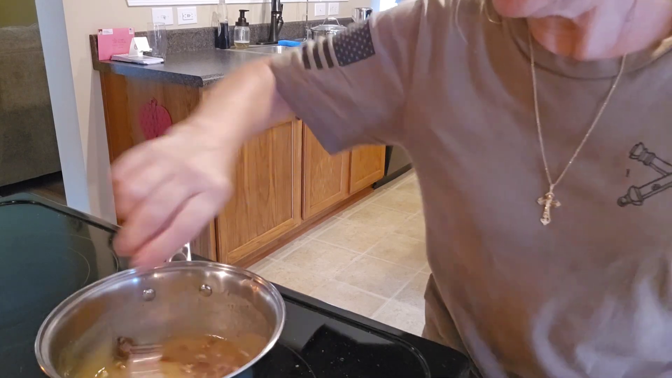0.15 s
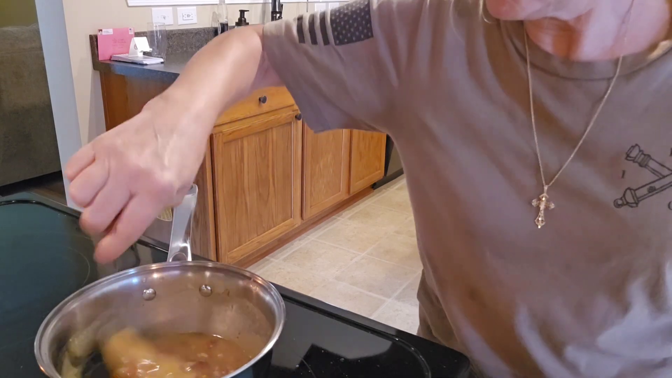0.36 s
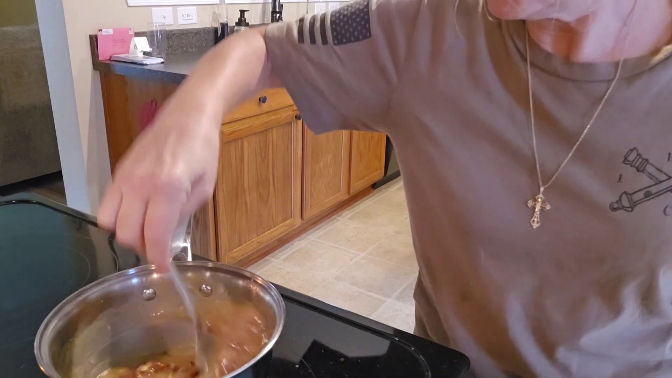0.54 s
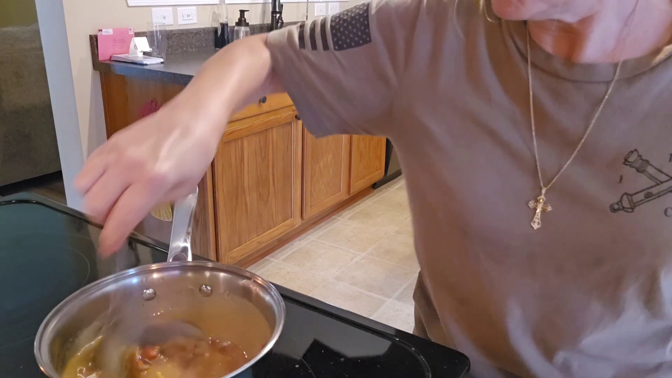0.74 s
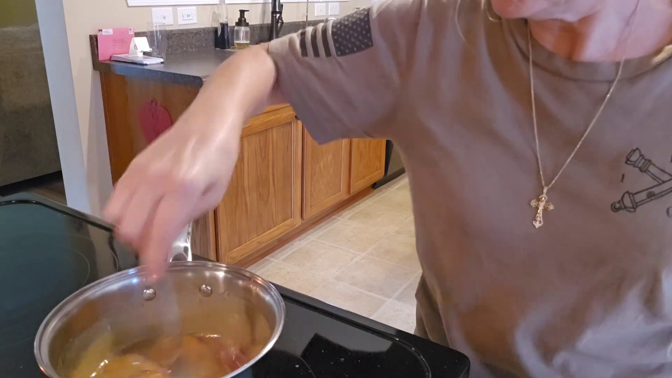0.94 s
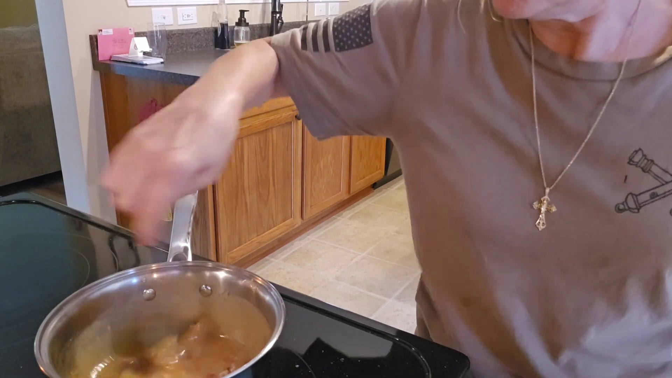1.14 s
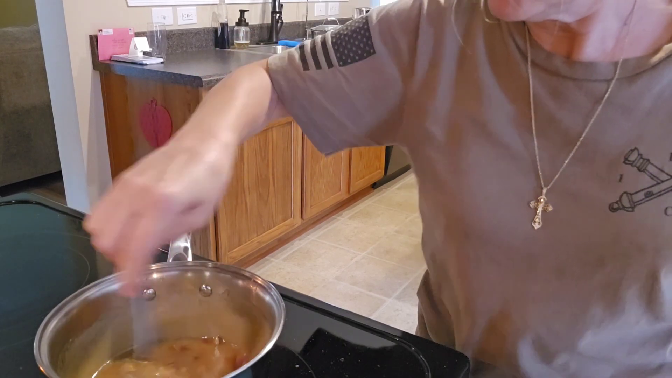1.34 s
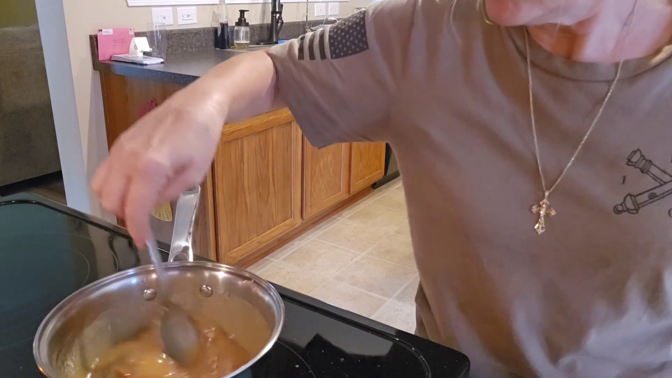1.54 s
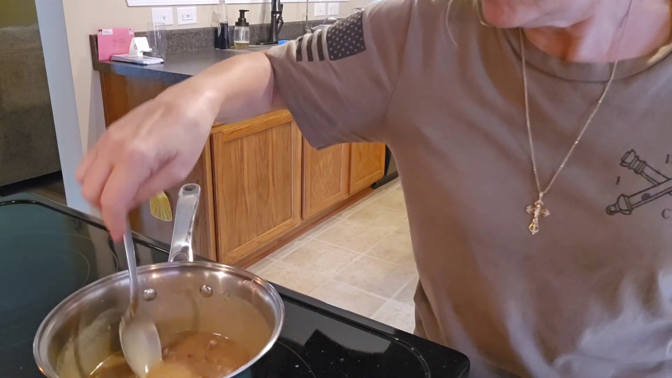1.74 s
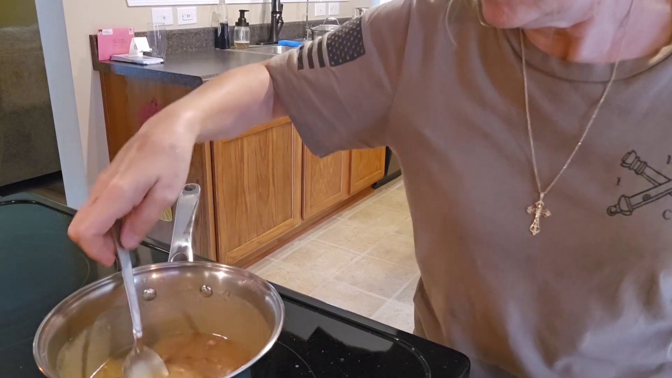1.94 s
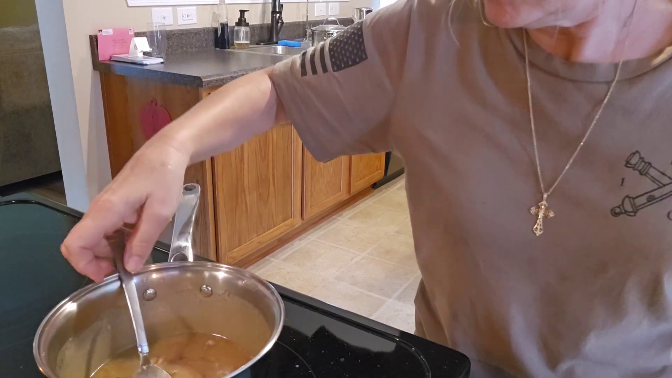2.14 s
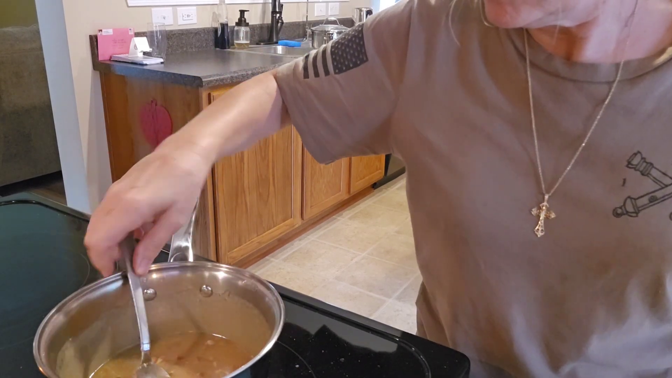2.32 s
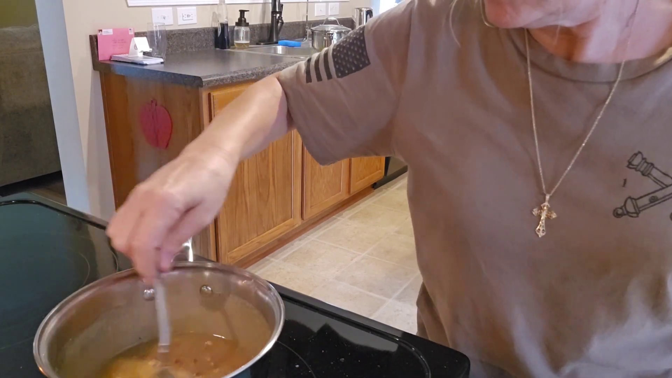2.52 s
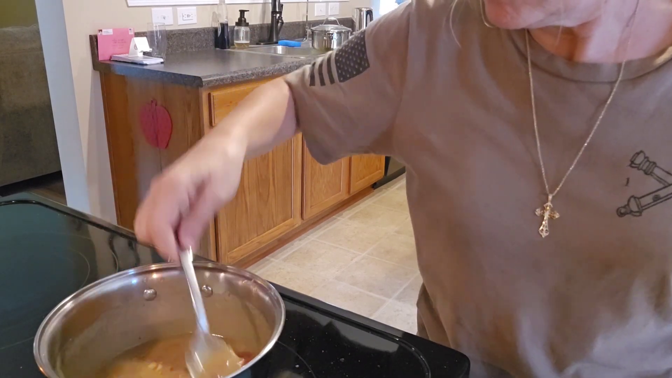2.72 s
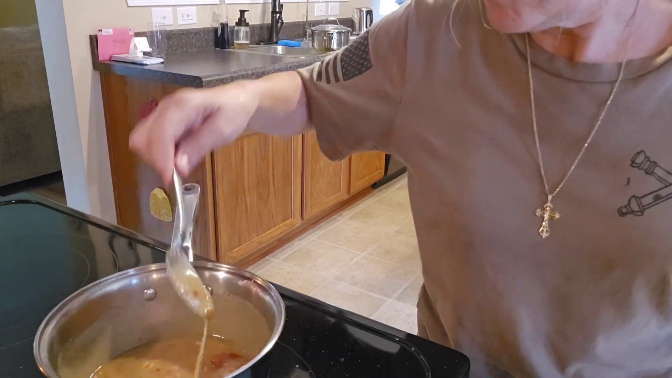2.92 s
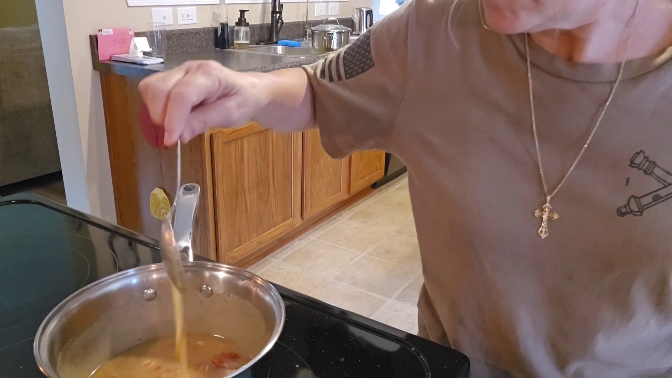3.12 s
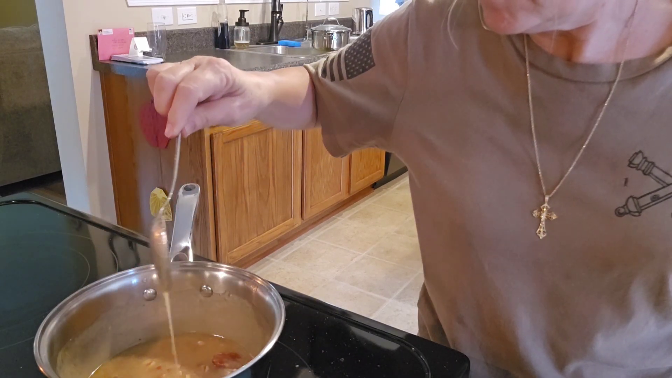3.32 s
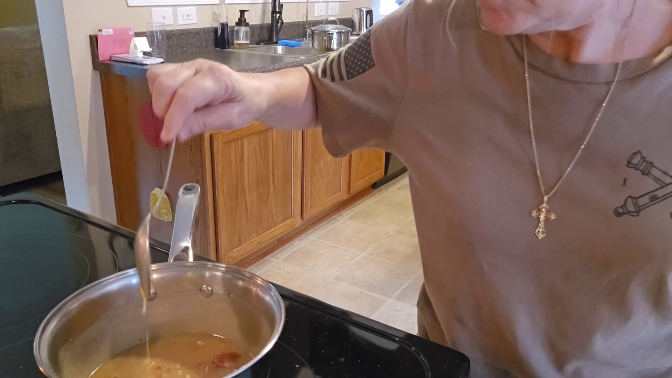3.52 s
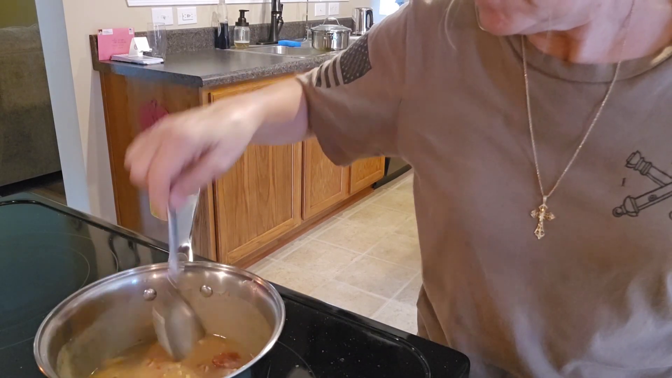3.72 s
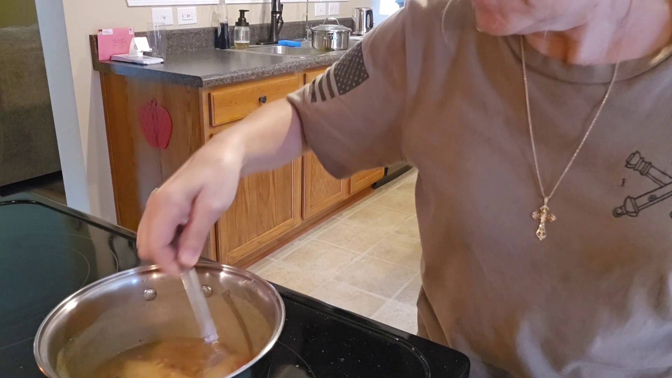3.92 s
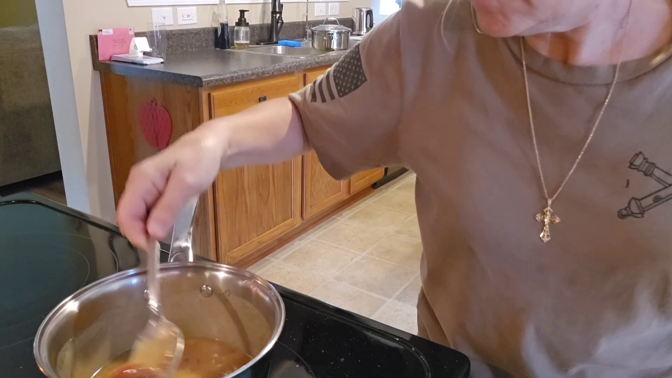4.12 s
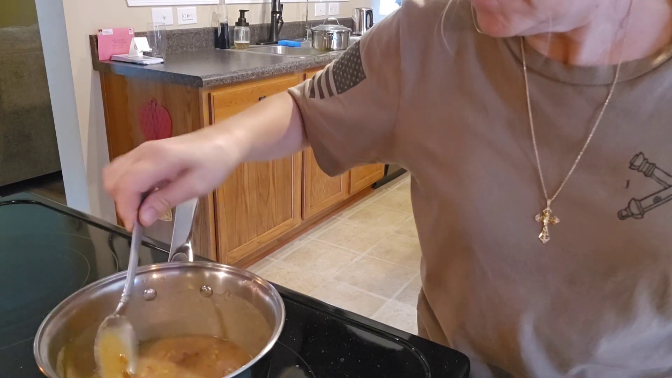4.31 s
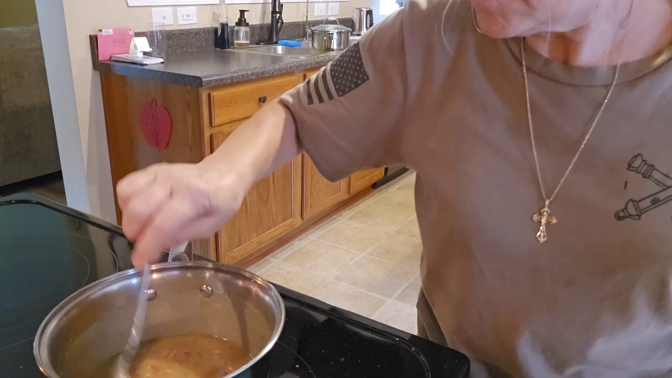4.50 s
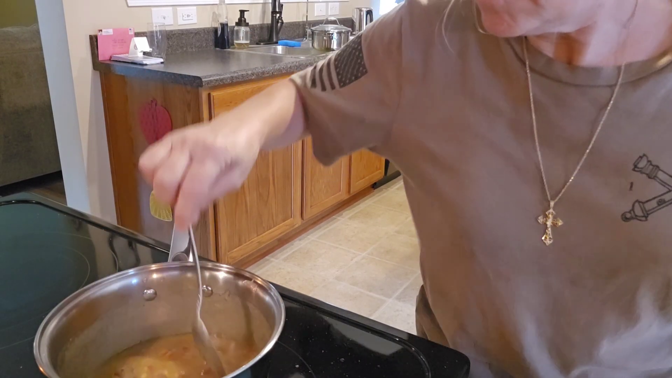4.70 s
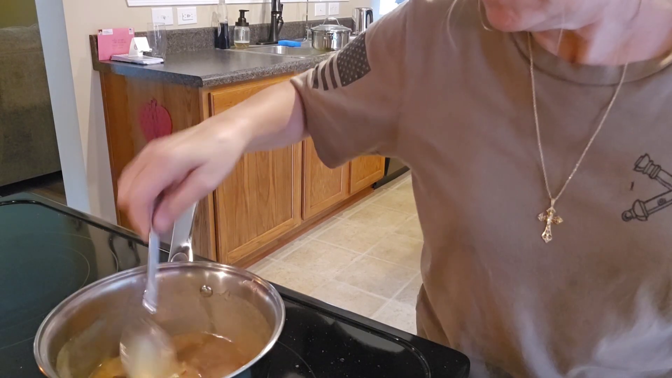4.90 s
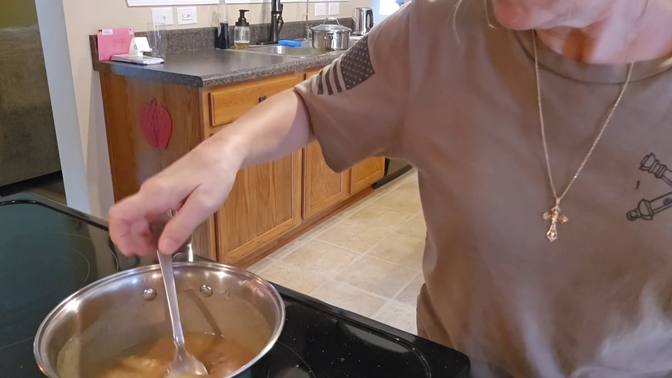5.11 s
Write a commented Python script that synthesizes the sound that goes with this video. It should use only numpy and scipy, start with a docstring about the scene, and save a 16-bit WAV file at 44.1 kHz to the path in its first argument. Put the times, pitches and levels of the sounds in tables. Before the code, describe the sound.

Close in a home kitchen, rapid rough scrapes of a spoon on a steel pan base come first, mixed with clinks and soft bubbly plops. Scraping thins out to separate knocks, stops while the spoon drips, then resumes with hard ringing clanks and dull thuds from the hob. The room gives a short lively echo; a steady low hum and soft rush stay behind everything.

```python
"""A spoon scrapes the steel base of a saucepan, with short squeals, and soon knocks on the wall.
Random slips shake the pan's resonances; knocks also ring the spoon and thud the pan on a glass hob.
Thick sauce plops as air pockets close (short sines), and small ticks come as the spoon hangs above to drip.
At the end the spoon is set down in the pan. Filtered noise and steady tones make an appliance's rush and hum.
Changing echoes place it all close by in a home kitchen."""
import sys
import numpy as np
from scipy import signal
from scipy.fft import rfft, irfft, next_fast_len
from scipy.io import wavfile
from scipy.ndimage import uniform_filter1d, map_coordinates

SR = 44100
rng = np.random.default_rng(int(sys.argv[2]) if len(sys.argv) > 2 else 0)


def master(y):
    """Save y as 16-bit WAV."""
    cut = np.clip(np.atleast_2d(y).T, -1, 1)
    pcm = np.round(cut * 32767)  # scale
    wavfile.write(sys.argv[1], SR, pcm.astype(np.int16))


N = 231697
T = np.arange(N) / SR  # time in seconds

# appliance rush, shape before levelling: f/Hz, density/dB per Hz
RUSH_SPECTRUM = [(15, -48.5), (25, -32), (59, -13), (123, -15), (195, -8.5), (242, -8), (301, -22.5),
                 (335, -14.5), (659, -37.5), (863, -33.5), (2690, -60.5), (5280, -59), (9070, -90),
                 (11000, -59.5), (16000, -77.5)]
# how alike diffuse sound is at the two ears: f/Hz, likeness (1 = the same)
EAR_LIKENESS = [(30, 0.45), (80, 0.67), (200, 1), (500, 0.15), (1500, 0.11)]
# steady appliance tones: f/Hz, level/dB
HUM_TONES = [(73, -59), (120, -56.5), (240, -59.5), (5450, -88.5), (10650, -92.5)]
# room tail: f/Hz, time to fall 60 dB/s (a negative time makes the tail grow until the final fade)
ROOM_DECAY = [(100, -0.1), (500, 0.78), (2000, 0.5852), (4000, 0.56), (8000, 0.47), (16000, 0.51)]
# strength of the room tail: f/Hz, level/dB
ROOM_LEVEL = [(100, -1.5), (500, -1.5), (2000, -5), (4000, -3), (8000, -8), (16000, -11)]
# balance of the direct sound: f/Hz, left minus right/dB
LEFT_RIGHT = [(100, -1), (700, -1), (2000, -2.5), (5000, -6.5), (9000, -9.5), (14000, -9)]
# tiny ticks: t/s, relative level/dB, centre f/Hz
TICK_EVENTS = [(1.745, -47, 13670), (3.113, -58, 3400), (3.222, -57.5, 4570), (3.306, -40, 5100),
               (3.489, -48, 5420), (4.096, -46, 13340)]
# air pockets closing in the sauce: t/s, relative level/dB, middle f/Hz
AIR_POCKETS = [(0.36, -34, 854), (.646, -29.5, 672), (.88, -25, 800), (.965, -36.5, 610),
               (1.002, -36.5, 780), (1.093, -42, 874), (1.88, -52.5, 1210), (3.244, -43, 890),
               (4.582, -40.5, 650)]
# steel modes damped by the sauce: f/Hz, width/Hz, relative level/dB
PAN_MODES = [(483, 260, -2.5), (886, 130, 2), (1281, 92, -0.5), (1589, 214, 3.5), (2025, 273, 1.5),
             (3013, 310, 9.5), (3396, 1030, 0.5), (3840, 210, 8), (4123, 170, 7.5), (4974, 515, 8),
             (5460, 380, 4.5), (5990, 570, 3.5), (7280, 870, 0), (8610, 320, 5), (9400, 380, -7),
             (9800, 67, -8.5), (10050, 1800, -14), (12010, 360, 1), (15300, 310, -19.5)]
# the whole pan bouncing on the hob: f/Hz, relative level/dB, time to fall 60 dB/s
HOB_MODES = [(128, -13.5, 0.33), (165.4, -15.5, 0.62), (185.3, -7, 0.14), (235, 0, 0.022),
             (347.4, -5, 0.045), (433, -13, 0.028)]
# spoon on pan: t/s, relative strength/dB, brightness/dB per octave, wall clang/dB,
# thud level/dB, spoon's note f/Hz, note level/dB
KNOCK_EVENTS = [(0.084, -10, 10, -6, -38.5, 1603, -30.5), (0.122, -11.5, -1.5, -1.5, -38.5, 1910, -40),
                (0.4698, -3, -2, 0.5, -28, 2893, -24.5), (1.039, -16, -1, -3, -39, 3160, -50),
                (1.9399, 4.5, -.5, -6.5, -25, 2000, -28), (1.9553, -6.5, -2, -4, -35.5, 1927, -32),
                (2.187, -3, 1, -2, -32.5, 2327, -30), (2.7435, -8.5, -1, -0.5, -47, 3050, -46),
                (2.751, -7.5, 0, -2.5, -45, 1673, -40), (3.8806, -5.5, 2, -8, -43, 1396, -40),
                (3.9021, 5.5, 3.5, -7.5, -22.5, 4430, -38), (4.6552, 9.5, 0.3, 7, -20.5, 3170, -20),
                (5.1162, 0.5, 0, -9, -31.5, 2100, -32), (5.1669, 11, 4, -8.5, -21.5, 2247, -17),
                (5.185, 5, 1.5, -9, -45, 3890, -25.5)]
# spoon sticking and slipping in step: middle t/s, half length/s, f/Hz, level/dB
SQUEAL_EVENTS = [(.025, 0.024, 1600, -42), (.055, 0.014, 216, -33.5), (.612, 0.018, 12000, -39),
                 (.60, 0.029, 2025, -46.5), (.79, 0.031, 8800, -41), (.838, 0.0051, 3886, -24),
                 (1.145, 0.031, 3720, -40), (1.30, 0.027, 12060, -41.5), (1.32, 0.011, 180, -37),
                 (2.685, 0.02, 4110, -38)]
# pushes over the steel: start t/s, length/s, relative level/dB, swell from start to end/dB,
# sharp grit relative/dB, dull rub relative/dB
PUSHES = [(-.01, 0.1, -31.5, -1, 0, -11.5), (0.453, 0.23, -32, -6, 5.5, -10.5),
          (.737, 0.1, -30.5, 6, -1, -15.5), (0.835, 0.16, -36, 6, -6, -7.5),
          (1.047, 0.12, -34, 6, 1.5, -16), (1.18, 0.17, -33.5, 5.5, -0.5, -11.5),
          (1.388, 0.1, -34.5, 0, -3, -10.5), (1.517, 0.1, -40, -2.5, -1.5, -8.5),
          (2.547, 0.19, -48, 26.5, -6.5, -6.5), (3.891, 0.1, -41.5, -5.5, -0.5, -4.5),
          (4.356, 0.024, -65.5, -0.5, -8.5, 6)]

RUSH_DB = -52
STIRS_PER_S, LEFT_LAG_S = 1.5, 0.0001  # the lag is an average
OVERTONE = 2.4  # the spoon's second note, as a multiple of its first
BITE_S, LET_GO_S = 0.0071, 0.004  # how fast a push starts and ends
ARCH_DB = 3.5  # extra pressure midway through a push
GRIT_PER_DB, RUB_PER_DB = 0.6, -0.43  # dB gained per dB of pressure: pressing sharpens the sound
TREMOR_DB, TREMORS_PER_S = 1.24, 26  # the hand's unsteady pressure
CEILING, CUTOFF_HZ = 0.9, 15800  # soft peak limit, before the top is cut


def from_db(db):
    """Turn decibels into a gain."""
    return 10 ** (np.asarray(db) / 20)


def at_hz(points, hz):
    """Read a table between its rows, on a log-frequency axis."""
    f, value = np.transpose(points)
    return np.interp(np.log(np.maximum(hz, 1)), np.log(f), value)


def butter(x, hz, kind, order=2):
    """Filter that reacts only to sound already past, with a smooth passband."""
    limit = np.minimum(hz, SR / 2 - 100)
    sections = signal.butter(order, limit, kind, fs=SR, output="sos")
    return signal.sosfilt(sections, x + 1e-18)


def drift(rate):
    """Smooth random wander, spread about 1, that turns about rate times a second."""
    coarse = T[::32]
    wander = map_coordinates(rng.standard_normal(4096), [coarse * rate], order=2, mode="wrap")
    return np.interp(T, coarse, wander)


def steady(x, size=2048):
    """Hold the average power at 1 over a short moving window: the grain stays, the swell goes."""
    return x / np.sqrt(np.abs(uniform_filter1d(x * x, size)) + 1e-20)


def resonate(x, hz, width_hz):
    """Shake one resonance, whose gain is 1 at its top."""
    r = np.exp(-np.pi * width_hz / SR)
    feed = np.array([1, 0, -1]) * (1 - r * r) / 2
    feedback = [1, -2 * r * np.cos(2 * np.pi * hz / SR), r * r]
    return signal.lfilter(feed, feedback, x + 1e-18)


def ring(t, hz, t60):
    """A sine that falls 60 dB in t60 seconds."""
    return np.sin(2 * np.pi * hz * t) * from_db(-60 * t / t60)


def add(track, s, sound):
    """Mix a sound into a track at s seconds."""
    start = max(round(s * SR), 0)
    track[start:start + len(sound)] += sound[:N - start]


def stereo(pair, hz):
    """Mix shared and opposite noise, so the ears match as closely as the table says at each pitch."""
    alike = np.clip(at_hz(EAR_LIKENESS, hz), -1, 1)
    shared = np.sqrt(1 + alike) * pair[0]
    opposite = np.sqrt(1 - alike) * pair[1] * np.array([[1], [-1]])
    return (shared + opposite) / np.sqrt(2)


def background():
    """An appliance's even, low rush of shaped noise, its hum and a faint whine."""
    size = next_fast_len(N)
    hz = np.fft.rfftfreq(size, 1 / SR)
    noise = stereo(rfft(rng.standard_normal((2, size))), hz)
    rush = irfft(noise * from_db(at_hz(RUSH_SPECTRUM, hz)), size)[:, :N]
    # the higher the tone, the more its phase wanders
    tones = sum(from_db(db) * np.sin(2 * np.pi * f * (T + 0.00002 * drift(60))) for f, db in HUM_TONES)
    return from_db(RUSH_DB) * steady(rush, size=3000) + tones


def echoes(near_db=-7, near_t60=0.07, gap_s=0.0013):
    """Response of one spot: quick echoes off hob and cook, plus a room tail shaped band by band."""
    t = T[:SR * 3 // 4]
    edges = np.geomspace(70, 18000, 13)
    white = rng.standard_normal((2, 2, len(t)))
    near = from_db(-60 * t / near_t60) * (t > 0.001)
    near_power = from_db(2 * near_db) * near ** 2 / np.sum(near ** 2)
    response = np.zeros((2, len(t)))
    for k, (low, high) in enumerate(zip(edges, edges[1:])):
        hz = np.sqrt(low * high)
        tail = from_db(-60 * t / at_hz(ROOM_DECAY, hz)) * (1 - np.exp(-(t / gap_s) ** 2))
        tail_power = from_db(2 * at_hz(ROOM_LEVEL, hz)) * tail ** 2 / np.sum(tail ** 2)
        band = butter(stereo(white[k % 2], hz), [low, high], "band")
        response += np.sqrt(tail_power + near_power) * band
    return response * np.clip(3 - 4 * t / t[-1], 0, 1)  # final fade to silence


def kitchen(x, count=4):
    """Direct sound from the right; the echoes change as the spoon circles from spot to spot."""
    place = count * STIRS_PER_S * T
    size = next_fast_len(N + SR)
    echo = 0
    for spot in range(count):
        distance = np.abs((place - spot + count / 2) % count - count / 2)
        nearness = np.cos(np.minimum(distance, 1) * np.pi / 2)
        echo = echo + irfft(rfft(x * nearness, size) * rfft(echoes(), size), size)[:, :N]
    # the left ear's delay sways once per stir
    lag = LEFT_LAG_S * (1 + 0.5 * np.sin(2 * np.pi * STIRS_PER_S * T))
    left = map_coordinates(x, [(T - lag) * SR], order=3)
    hz = np.fft.rfftfreq(size, 1 / SR)
    balance = from_db(at_hz(LEFT_RIGHT, hz) * np.array([[0.5], [-0.5]]))
    direct = irfft(rfft(np.array([left, x]), size) * balance, size)[:, :N]
    return echo + direct


def ticks(breadth=2.6, length_s=0.0019, tick_db=-4):
    """Short noise bursts make small sharp ticks, most of them while the spoon hangs over the pan."""
    out, t = np.zeros(N), T[:SR // 20]
    for s, db, hz in TICK_EVENTS:
        burst = rng.standard_normal(len(t)) * np.exp(-t / length_s)
        add(out, s, from_db(db + tick_db) * butter(burst, [hz / breadth, hz * breadth], "band"))
    return out


def plops(t60=0.0058, octaves=2.4, cluster_s=0.016, count=7, plop_db=-3):
    """Thick sauce closes over a cluster of air pockets of many sizes; each rings and is quickly damped."""
    out, t = np.zeros(N), T[:SR // 10]
    for s, db, hz in AIR_POCKETS:
        for size, (late, detune) in zip(np.linspace(-0.5, 0.5, count), rng.random((count, 2))):
            pitch = hz * 2 ** (octaves * (size + (detune - 0.5) / count))
            gain = from_db(db + plop_db) * (1 - np.abs(size))
            add(out, s + cluster_s * late, gain * ring(t, pitch, t60))
    return butter(out, 200, "high")


def pan_body(force, shift_db, dense_db=-10):
    """Strong steel modes over a bed of weak, overlapping ones; strengths vary as the contact point moves."""
    modes = 0
    for k, (hz, width, db) in enumerate(PAN_MODES):
        push = force * from_db(db + shift_db * drift(16))
        modes = modes + (-1) ** k * resonate(push, hz, width)
    return modes + from_db(dense_db) * butter(force, 440, "high", order=1)


def clink(t, hz, split=0.055, t60=0.045):
    """The spoon's bowl rings in close pairs of modes that beat."""
    return ring(t, hz, t60) - 0.5 * ring(t, hz * (1 - split), t60)


def rebounds(chatter_s, size=1024):
    """A burst of tiny rebounds, even in colour, as a spectrum."""
    burst = rng.standard_normal(size)
    # fade in time, then even out the colour, three times over
    for _ in range(3):
        spectrum = rfft(burst * np.exp(-T[:size] / chatter_s))
        spectrum = spectrum / np.abs(spectrum)
        burst = irfft(spectrum)
    return spectrum


def knocks(chatter_s=0.007, high_note_db=-6, steel_db=2, thud_cut_hz=125, wall_hz=4400, wall_octaves=0.95):
    """Each blow rings pan and spoon and thuds the hob; grip sets the note, a high wall hit clangs most."""
    force, notes, thuds = np.zeros((3, N))
    t = T[:SR // 2]
    hz = np.maximum(np.fft.rfftfreq(1024, 1 / SR), 500)
    octaves = np.log2(hz / wall_hz)
    wall = np.exp(-(octaves / wall_octaves) ** 2 / 2)
    for s, db, tilt_db, wall_db, thud_db, note_hz, note_db in KNOCK_EVENTS:
        burst = irfft(rebounds(chatter_s) * from_db(tilt_db * octaves + wall_db * wall))
        add(force, s, from_db(db + steel_db) * burst[:len(burst) // 2])
        note = clink(t, note_hz) + from_db(high_note_db) * clink(t, OVERTONE * note_hz)
        add(notes, s, from_db(note_db) * note)
        thud = sum(from_db(g) * ring(t, f, t60) for f, g, t60 in HOB_MODES)
        add(thuds, s, from_db(thud_db) * thud)
    return pan_body(force, shift_db=-1.0) + notes + butter(thuds, thud_cut_hz, "high", order=4)


def squeals(waver=0.013):
    """For a moment the slips lock to one resonance and a wavering note stands out."""
    out, wobble = np.zeros(N), 1 + waver * drift(260)
    for s, half_s, hz, db in SQUEAL_EVENTS:
        on = np.abs(T - s) < 3 * half_s
        swell = np.exp(-((T[on] - s) / half_s) ** 2 / 2)
        note = np.sin(2 * np.pi * hz * np.cumsum(wobble[on]) / SR)
        out[on] += from_db(db) * swell * note
    return out


def pushes():
    """Gains over time of the scrape, its grit and its dull rub; all follow the pressure of each push."""
    gains, tremor = np.zeros((3, N)), TREMOR_DB * drift(TREMORS_PER_S)
    for s, length, db, swell_db, grit_db, rub_db in PUSHES:
        along = np.clip((T - s) / length, 0, 1) - 0.5
        pressure = swell_db * along - ARCH_DB * (2 * along) ** 2 + tremor
        bite = np.minimum(T - s, 0) / BITE_S
        let_go = np.maximum(T - s - length, 0) / LET_GO_S
        contact = np.exp(bite - let_go)
        colour = [0 * pressure, grit_db + GRIT_PER_DB * pressure, rub_db + RUB_PER_DB * pressure]
        gains = np.maximum(gains, contact * from_db(db + pressure + np.array(colour)))
    return gains


def scrape(slips_per_s=4000, size_db=2.0, judder_db=1.52, wall_echo=0.33, wall_s=0.000882, travel=0.18,
           mid_db=-0.5, grit_db=-3.5, rub_db=-4, drag_db=-9):
    """The spoon's edge catches on the base thousands of times a second and shakes the pan."""
    level, sharp, dull = pushes()
    sizes = from_db(size_db * np.minimum(rng.exponential(1, N), 4))
    slips = (rng.random(N) < slips_per_s / SR) * rng.choice([-1, 1], N) * sizes
    slips = slips * from_db(judder_db * drift(130))
    steel = pan_body(slips, shift_db=4.0)
    # the echo off the pan wall shifts as the spoon travels, so the colour swirls
    delay = wall_s * (1 + travel * drift(7.6))
    steel = steel + wall_echo * np.interp(T - delay, T, steel)
    middle = steady(butter(steel, [2600, 7400], "band", order=3))
    grit = steady(butter(steel, 5205, "high", order=4))
    rub = steady(butter(steel, [600, 2300], "band", order=3))
    drag = steady(butter(slips, [170, 600], "band"))
    return (level * from_db(mid_db) * middle + sharp * from_db(grit_db) * grit
            + dull * from_db(rub_db) * rub + dull * from_db(drag_db) * drag)


def scene(tick_room_db=-5):
    """The pan in its kitchen, with the ticks also heard close by at half strength."""
    close = ticks()
    pan = scrape() + squeals() + knocks() + plops()
    return kitchen(pan + from_db(tick_room_db) * close) + close / 2 + background()


def record(dry):
    """Round off the hardest clanks and cut the top steeply."""
    rounded = CEILING * np.tanh(dry / CEILING)
    top_cut = signal.ellip(10, 0.2, 80, CUTOFF_HZ, fs=SR, output="sos")
    return signal.sosfilt(top_cut, rounded)


dry = scene()
out = record(dry)
master(out)
```